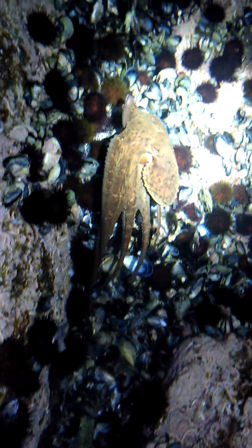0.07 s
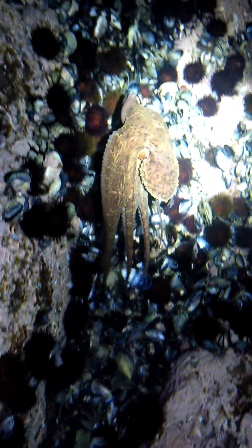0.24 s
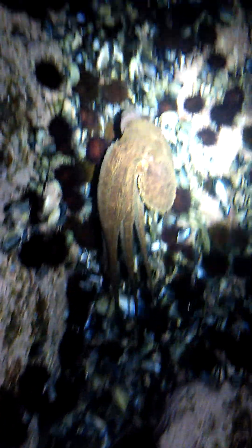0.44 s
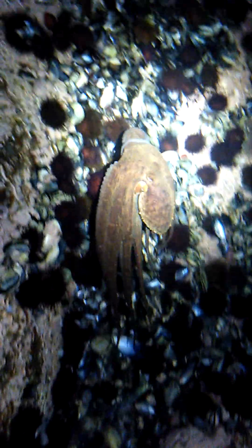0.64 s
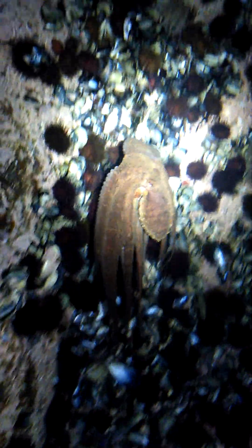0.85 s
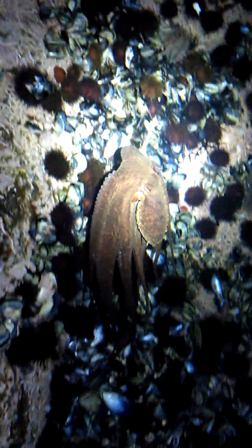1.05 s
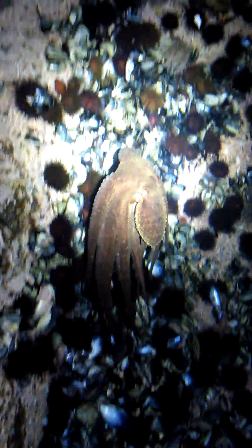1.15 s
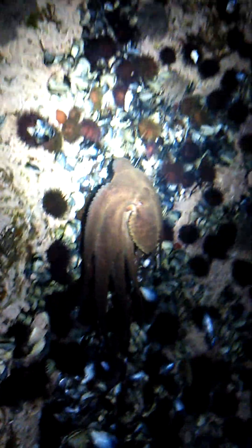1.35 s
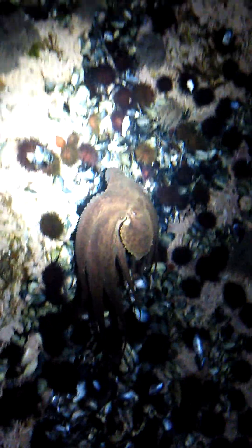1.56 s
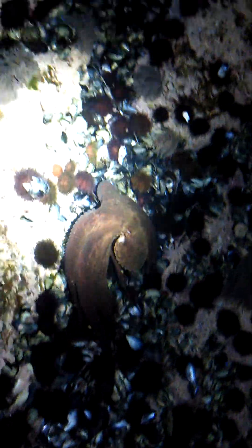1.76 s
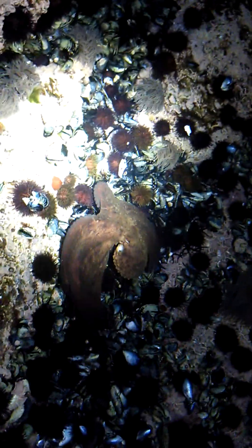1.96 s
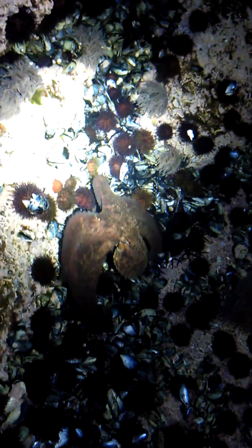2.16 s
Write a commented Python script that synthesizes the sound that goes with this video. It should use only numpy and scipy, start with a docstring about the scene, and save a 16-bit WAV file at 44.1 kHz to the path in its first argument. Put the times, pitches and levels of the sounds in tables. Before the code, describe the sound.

Wet shells snap and crackle in irregular clusters as an octopus crawls over them, surf rumbling far behind

```python
"""An octopus crawls over wet shells and rock on a shore at night, heard from close by.
Distant surf rumbles throughout, its bass slowly rising, under a faint hiss. A bubble plops at the start.
Shells snap and tick in clusters over a fine wet crackle: noise bursts ringing in shell resonances.
At 0.7 s a soft rub leads into a dense crunch of fractures and grinding; two more bubbles follow near 1 s.
Snaps cluster again around 1.3 s, then grow sparse as the crackle thins out."""
import sys
import numpy as np
from scipy import signal
from scipy.fft import rfft, irfft, next_fast_len
from scipy.io import wavfile
from scipy.ndimage import map_coordinates

SR = 44100
rng = np.random.default_rng(int(sys.argv[2]) if len(sys.argv) > 2 else 0)


def dump(signal):
    """Clip the signal to [-1, 1] and save it as 16-bit WAV at the path in sys.argv[1]."""
    limited = np.clip(np.atleast_2d(signal).T, -1, 1)
    pcm = np.round(limited * 32767).astype(np.int16)
    wavfile.write(sys.argv[1], SR, pcm)


N = 97020  # 2.2 s

# Faint reflections from the rocks around, relative to the direct sound
SCATTER_DB, SCATTER_DECAY_S = -20, 0.011


def undb(db):
    """Decibels to gain."""
    return 10 ** (np.asarray(db) / 20)


def unit(x):
    """Scale to rms 1."""
    return x / np.sqrt(np.mean(x ** 2) + 1e-18)


def curve(rows):
    """Gain over time from (time_s, level_db) points."""
    time_s, level_db = np.array(rows).T
    return undb(np.interp(np.arange(N) / SR, time_s, level_db))


def walk(hz):
    """Smooth random wander with spread near 1, taking hz new values per second."""
    steps = rng.standard_normal(N // 10)
    return np.sqrt(2) * np.interp(np.arange(N) * hz / SR, np.arange(len(steps)), steps)


def colour(x, points):
    """Causal minimum-phase filter whose spectrum follows (freq_hz, level_db) points."""
    size = 2 * next_fast_len(len(x))
    freq_hz, level_db = np.array(points).T
    bins_hz = np.arange(size // 2 + 1) * SR / size
    log_gain = np.log(undb(np.interp(np.log(bins_hz + 1), np.log(freq_hz), level_db)))
    # folding the cepstrum forward in time keeps the ring after its excitation
    cepstrum = irfft(log_gain)
    cepstrum[1:size // 2] *= 2
    cepstrum[size // 2 + 1:] = 0
    response = np.exp(rfft(cepstrum))
    return irfft(rfft(x, size) * response)[:len(x)]


def ringing(envelope, ring, flicker_db=0):
    """Noise under an envelope, through a resonance, at rms 1; flicker varies the excitation quickly."""
    flicker = undb(flicker_db * walk(hz=255))
    return unit(colour(envelope * flicker * rng.standard_normal(N), ring))


def grains(per_s, spread_db, decay_s):
    """Envelope of many small ticks at random moments and of random sizes, summed as energy."""
    sizes = undb(spread_db * np.minimum(rng.exponential(size=N), 3))
    ticks = (rng.random(N) < per_s / SR) * sizes
    t = np.arange(SR // 20) / SR
    shape = np.hypot(np.exp(-t / decay_s), undb(SCATTER_DB) * np.exp(-t / SCATTER_DECAY_S))
    energy = signal.fftconvolve(ticks ** 2, shape ** 2)[:N]
    return np.sqrt(np.abs(energy))


# Spectrum of the far surf: freq_hz, level_db (relative, per Hz)
SURF_SPECTRUM = [(22, -24), (37, -16.5), (50, 0), (70, -1.5), (110, 2.5), (160, -3), (250, -6),
                 (400, -13.5), (700, -24), (1200, -31.5), (2300, -30), (3700, -47), (8000, -61)]
# Spectrum of the hiss over it: freq_hz, level_db (relative, per Hz)
HISS_SPECTRUM = [(2000, -12), (4000, -9.5), (5500, -9), (7000, -7.5), (8500, -1.5), (11500, -18),
                 (16000, -8.5)]
SURF_DB, HISS_DB = -35, -55.5
SURF_SWELL_DB_PER_S = 2.2
SURF_ROLL_DB, SURF_ROLL_HZ = 1.1, 7.19


def surf():
    """Distant surf is shaped noise whose bass rolls unevenly and slowly rises, under a faint hiss."""
    t = (np.arange(N) - N / 2) / SR  # from the middle of the scene
    wash = ringing(1, SURF_SPECTRUM)
    bass = signal.sosfiltfilt(signal.butter(2, 250, fs=SR, output="sos"), wash)
    roll = undb(SURF_SWELL_DB_PER_S * t + SURF_ROLL_DB * walk(SURF_ROLL_HZ))
    rumble = wash - bass + bass * roll
    return undb(SURF_DB) * rumble + undb(HISS_DB) * ringing(1, HISS_SPECTRUM)


# Small bubbles close by: start_s, pitch_hz (at the start), peak_db
BUBBLE_EVENTS = [(.002, 2290, -31), (.956, 1634, -34), (1.096, 1580, -30)]
BUBBLE_DECAY_S = 0.002
BUBBLE_RISE_PER_S = 8.9  # pitch rise as a fraction of the starting pitch
BUBBLE_ROUGH_RAD = 0.81  # random phase wobble


def bubbles():
    """Each bubble plops with a short, rough sine that swells, dies away and rises in pitch."""
    out = np.zeros(N)
    wobble = BUBBLE_ROUGH_RAD * walk(hz=894)
    for start_s, pitch_hz, peak_db in BUBBLE_EVENTS:
        t = np.maximum(np.arange(N) / SR - start_s, 0)
        envelope = np.e * t / BUBBLE_DECAY_S * np.exp(-t / BUBBLE_DECAY_S)  # peaks at 1
        cycles = pitch_hz * t * (1 + BUBBLE_RISE_PER_S * t / 2)
        out += undb(peak_db) * envelope * np.sin(2 * np.pi * cycles + wobble)
    return out


# Shell resonances, also rung by the crunch and the snaps: freq_hz, level_db (relative)
BRIGHT_RING = [(3500, -39.5), (6500, -21), (7500, -9.5), (8400, 5), (9300, 1.5), (10300, -6.5),
               (11700, -19.5), (15500, -19.5)]
LOWER_RING = [(2500, -25), (4100, -16.5), (4700, -8), (5100, 0), (5600, 3), (6300, -4), (7200, -9),
              (10000, -14.5)]
HOLLOW_BODY = [(200, -36), (600, -12.5), (1100, -8.5), (1500, -5.5), (2100, 0), (2800, 0.5), (3700, -13),
               (6000, -26)]
# Loudness of the fine crackle's bright ring: time_s, level_db
CRACKLE_LEVEL = [(0, -45.5), (.42, -52.5), (.54, -38), (.66, -36.5), (.72, -28), (.87, -40.5), (.98, -34.5),
                 (1.06, -50), (1.2, -39), (1.36, -37.5), (1.45, -43), (1.55, -54), (2.2, -58)]
CRACKLE_PER_S, CRACKLE_SPREAD_DB = 750, 5
CRACKLE_LOWER_DB, CRACKLE_BODY_DB = -7.5, -15.5  # relative to the bright ring
CRACKLE_PITCH = 1.019  # small fragments ring higher than whole shells


def crackle():
    """Wet shell grit ticks finely in flickering shell resonances and thins out towards the end."""
    ticks = grains(CRACKLE_PER_S, CRACKLE_SPREAD_DB, decay_s=0.00052)
    small_bright = [(hz * CRACKLE_PITCH, db) for hz, db in BRIGHT_RING]
    parts = ((0, small_bright), (CRACKLE_LOWER_DB, LOWER_RING), (CRACKLE_BODY_DB, HOLLOW_BODY))
    grit = sum(undb(db) * ringing(ticks, ring, flicker_db=1.5) for db, ring in parts)
    return grit * curve(CRACKLE_LEVEL)


# Loudness of the crunch's bright ring, silent outside these times: time_s, level_db
CRUNCH_LEVEL = [(.738, -54), (.745, -20), (.76, -16), (.8, -21.5), (.825, -31), (.84, -19.5), (.856, -49),
                (.868, -50)]
# Spectrum of the grinding under the crunch: freq_hz, level_db (relative)
GRIND_SPECTRUM = [(300, -22), (600, -2.5), (900, 1.5), (1600, -3), (4000, -11.5), (14000, -14)]
# Spectrum of the soft rub before it: freq_hz, level_db (relative)
RUB_SPECTRUM = [(300, -21), (850, -2), (2500, -29), (6000, -30)]
CRUNCH_PER_S = 1800
CRUNCH_SPREAD_DB = -0.5  # negative: ticks vary downwards
CRUNCH_LOWER_DB, CRUNCH_BODY_DB = -3.5, -12  # relative to the bright ring
GRIND_DB = -12.5  # relative to the loudest moment of the crunch
GRIND_FOLLOWS = 0.53  # dB of grinding per dB of crunch
RUB_CENTRE_S, RUB_SPREAD_S, RUB_DB = 0.71, 0.014, -43


def crunch():
    """A soft rub swells, then shells give way in a dense run of fractures over a lower grinding."""
    ticks = grains(CRUNCH_PER_S, CRUNCH_SPREAD_DB, decay_s=0.00063)
    t = np.arange(N) / SR
    level = curve(CRUNCH_LEVEL) * (t > CRUNCH_LEVEL[0][0]) * (t < CRUNCH_LEVEL[-1][0])
    parts = ((0, BRIGHT_RING), (CRUNCH_LOWER_DB, LOWER_RING), (CRUNCH_BODY_DB, HOLLOW_BODY))
    fractures = level * sum(undb(db) * ringing(ticks, ring, flicker_db=2.0) for db, ring in parts)
    loudest = level.max()
    grind_level = undb(GRIND_DB) * loudest * (level / loudest) ** GRIND_FOLLOWS
    grind = grind_level * ringing(ticks, GRIND_SPECTRUM)
    rub_level = undb(RUB_DB) * np.exp(-((t - RUB_CENTRE_S) / RUB_SPREAD_S) ** 2 / 2)
    rub = rub_level * ringing(ticks, RUB_SPECTRUM)
    return rub + fractures + grind


SNAP_ATTACK_S, SNAP_LONGEST_HOLD_S, SNAP_DECAY_S = 0.00043, 0.0022, 0.0016


def snap_shape(hold_s):
    """Envelope of one fracture: quick attack, short hold, fast decay and a faint scattered tail."""
    t = np.arange(SR // 10) / SR
    attack = np.minimum(t / SNAP_ATTACK_S, 1)
    crack = np.exp(-np.maximum(t - SNAP_ATTACK_S - hold_s, 0) / SNAP_DECAY_S)
    tail = undb(SCATTER_DB) * np.exp(-t / SCATTER_DECAY_S)
    return attack * np.hypot(crack, tail)


# Shell snaps close to the microphone: start_s, bright_ring_db, lower_ring_db, hollow_body_db
SNAP_EVENTS = [(0.018, -34.5, -41.5, -43), (0.073, -34, -45, -50.5), (0.1127, -34, -36.5, -58),
               (0.1205, -24.5, -23.5, -45), (0.13, -32.5, -49, -57), (0.2, -24.5, -40, -49),
               (0.2049, -15, -25, -25.5), (0.2799, -30, -39.5, -69), (0.3215, -21.5, -36, -46),
               (0.3298, -22.5, -26, -34), (0.3455, -32, -44, -49), (0.409, -33, -41.5, -50),
               (0.472, -34.5, -39, -46), (0.479, -28, -51, -60), (0.5098, -20.5, -22.5, -41),
               (0.5695, -31, -39, -39.5), (0.608, -28, -41, -51), (0.6382, -17, -30.5, -48),
               (0.6548, -33, -56, -54), (0.6648, -21, -37, -51), (0.7245, -32, -34, -60),
               (0.7413, -13.5, -14.5, -24.5), (0.7515, -17.5, -20, -24), (.77, -12.5, -28, -40),
               (0.7812, -10, -34, -43), (0.7974, -11, -36, -35), (0.8147, -16, -18.5, -64),
               (0.8187, -36, -27, -44), (0.8317, -17, -19, -31.5), (0.8521, -16.5, -22, -28),
               (0.8868, -24, -37, -40), (0.893, -20.5, -50, -56), (0.915, -32, -66, -48),
               (0.9527, -30.5, -51, -53), (1.0075, -31, -40.5, -50), (1.0724, -34, -40.5, -53),
               (1.1686, -20.5, -23.5, -30.5), (1.19, -29, -33, -47), (1.197, -27, -36, -56),
               (1.241, -29.5, -37, -49), (1.2684, -29, -34, -45.5), (1.2756, -12, -26.5, -35.5),
               (1.2852, -22, -52, -58), (1.2993, -31, -60, -64), (1.3111, -17.5, -31.5, -43.5),
               (1.3151, -26, -35, -44.5), (1.3477, -30, -35, -46), (1.366, -14, -27, -39),
               (1.3843, -13, -27, -37), (1.427, -27, -41, -46), (1.4368, -11.5, -22.5, -45),
               (1.4459, -23.5, -24.5, -43), (1.4883, -36.5, -34.5, -51), (1.5328, -26, -35.5, -44.5),
               (1.7528, -32, -40.5, -54), (1.8076, -29.5, -36.5, -52), (2.0511, -36, -38.5, -53.5),
               (2.0919, -27.5, -53, -61), (2.1649, -35.5, -44, -47), (2.1897, -34, -38, -41.5)]
SNAP_LEVEL_SPAN_S = 0.0055  # a burst's energy over this span gives its level
SHELL_SIZE_SPREAD = 0.045  # each shell rings at its own pitch
SNAP_RAGGED_DB, SNAP_RAGGED_HZ = 1, 800  # a snap breaks in uneven steps


def snaps():
    """Each snap is a ragged noise burst that rings three shell resonances in its own proportions."""
    out = np.zeros(N + SR)
    for start_s, bright_db, lower_db, body_db in SNAP_EVENTS:
        # longer cracks stir more of the lower ring
        hold_s = SNAP_LONGEST_HOLD_S * undb(min(lower_db - bright_db, 0))
        envelope = snap_shape(hold_s)
        shape = envelope * undb(SNAP_RAGGED_DB * walk(SNAP_RAGGED_HZ)[:len(envelope)])
        pitch = np.exp(SHELL_SIZE_SPREAD * rng.standard_normal())
        start = max(int(start_s * SR), 0)
        for db, ring in ((bright_db, BRIGHT_RING), (lower_db, LOWER_RING), (body_db, HOLLOW_BODY)):
            shell = [(hz * pitch, gain_db) for hz, gain_db in ring]
            burst = colour(shape * rng.standard_normal(len(shape)), shell)
            to_level = np.sqrt(SNAP_LEVEL_SPAN_S * SR / np.sum(burst ** 2))
            out[start:start + len(shape)] += burst * undb(db) * to_level
    return out[:N]


def scene():
    """Surf far behind, bubbles and shells close by, on one channel."""
    return (surf() + bubbles() + crackle() + crunch() + snaps())[None]


def record(dry):
    """The recorder rounds the highest peaks and cuts the top above 15.6 kHz."""
    rounded = dry / (1 + dry ** 6) ** (1 / 6)
    top_cut = signal.ellip(8, 0.2, 70, 15600, fs=SR, output="sos")
    return signal.sosfilt(top_cut, rounded)


dry = scene()
out = record(dry)
dump(out)
```